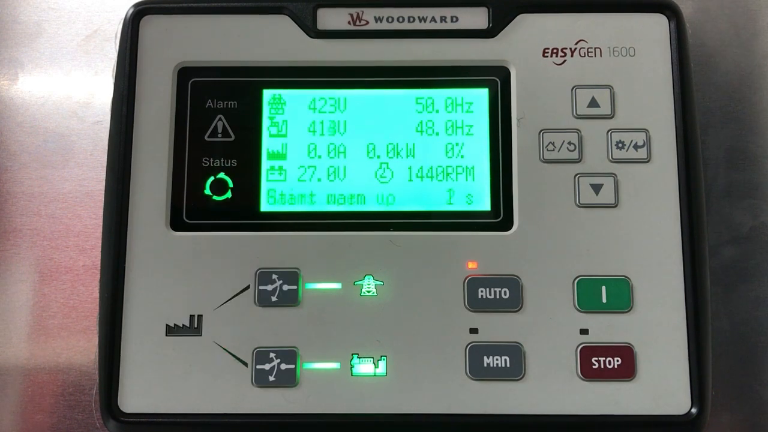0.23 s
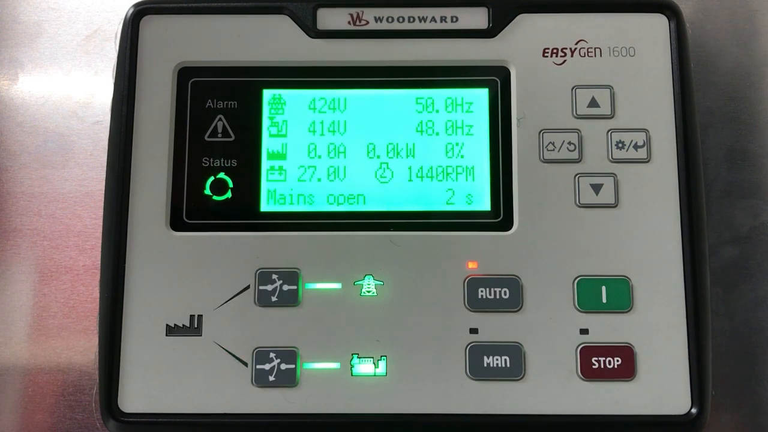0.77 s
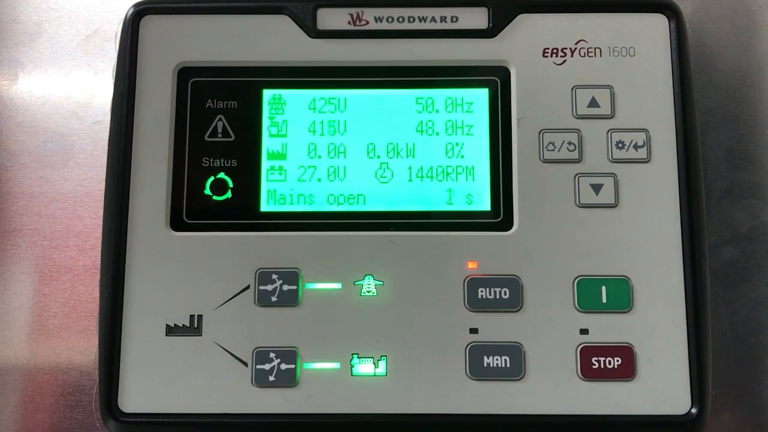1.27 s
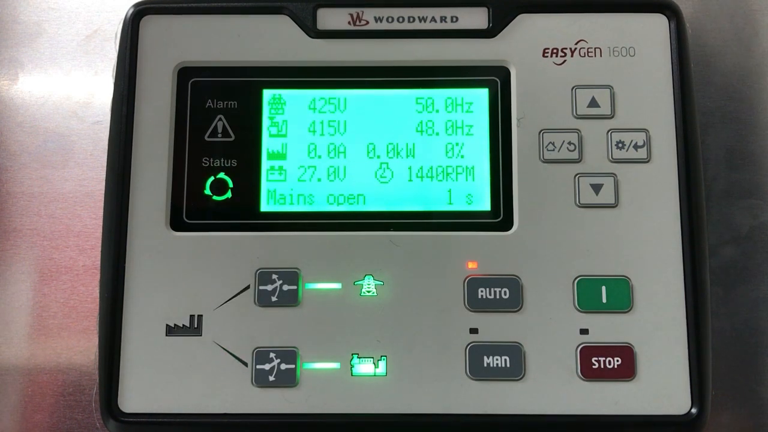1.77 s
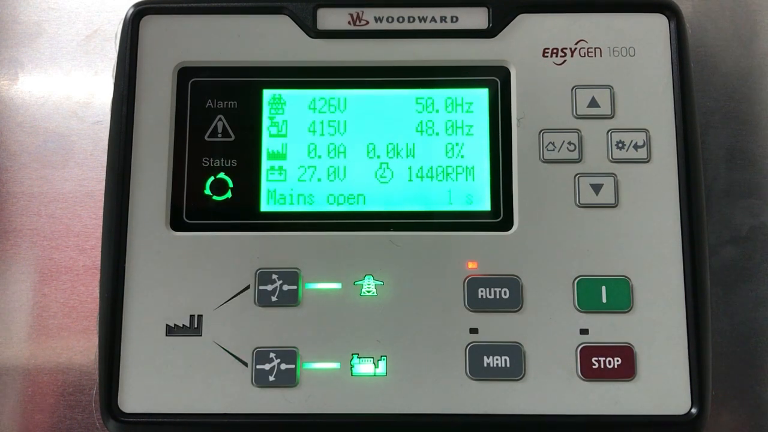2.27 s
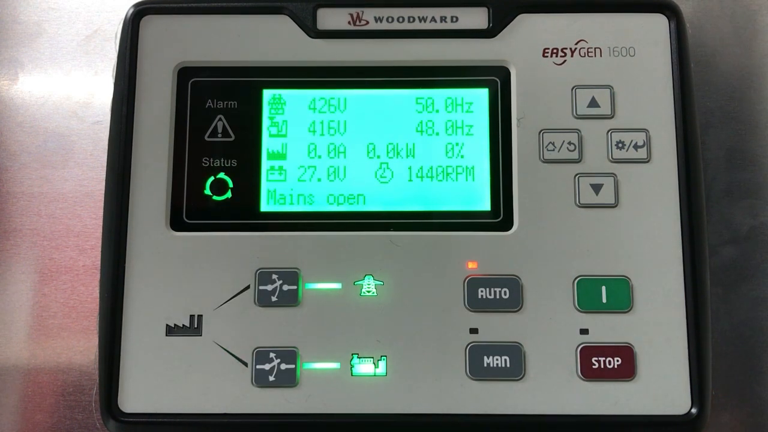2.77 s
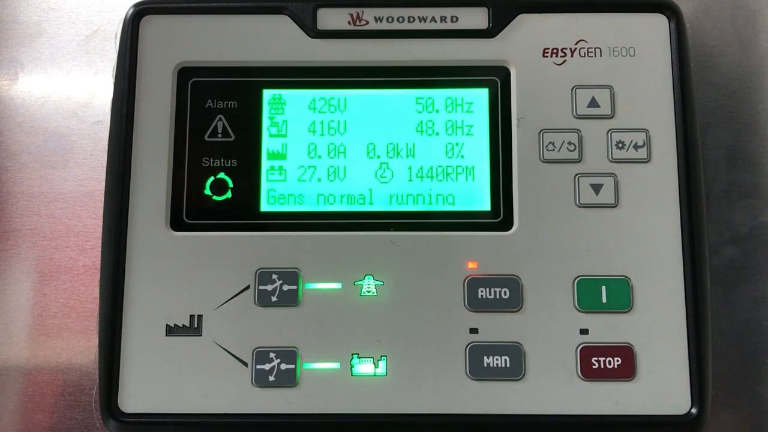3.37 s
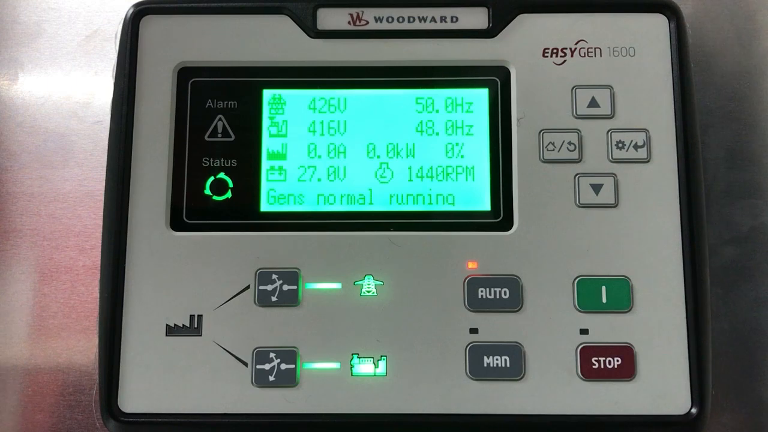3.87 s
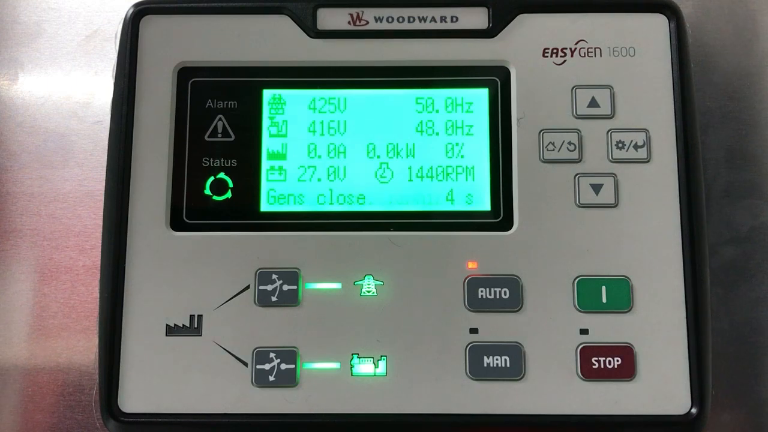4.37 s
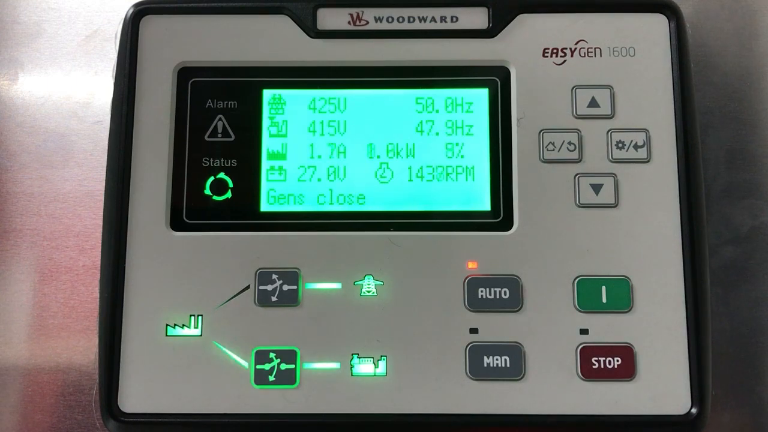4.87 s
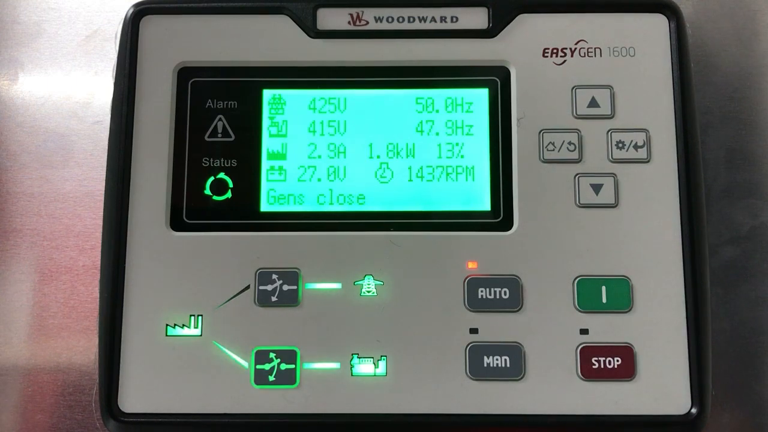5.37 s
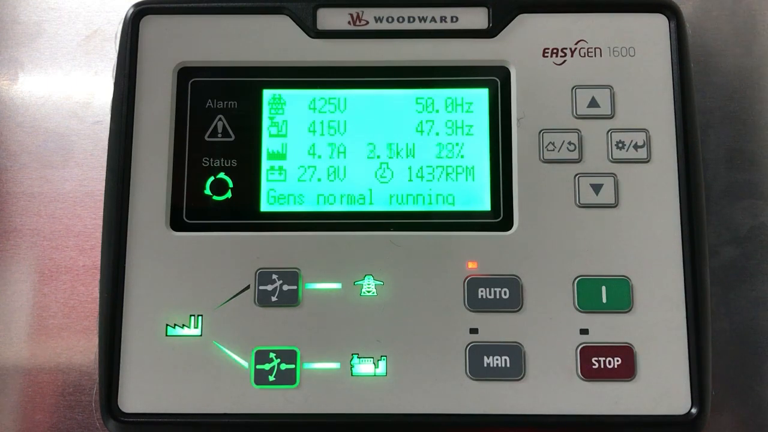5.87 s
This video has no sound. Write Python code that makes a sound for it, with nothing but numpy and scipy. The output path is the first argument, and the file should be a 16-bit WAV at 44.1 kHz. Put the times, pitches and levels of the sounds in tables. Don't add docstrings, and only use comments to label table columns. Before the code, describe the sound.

In a bare indoor test room, a tiny relay tick is followed at once by a loud, bouncing metallic contactor clunk that booms through cabinet panels. Sparse bright relay clicks follow over steady low generator hum and soft air noise. Around the middle a small latch clicks with a dull knock; later a sharper contact snaps shut, with more clicks after it. The microphone is fixed, the small relays closest.

```python
import sys
import numpy as np
from scipy import signal
from scipy.fft import rfft, irfft
from scipy.io import wavfile

SR = 44100
rng = np.random.default_rng(int(sys.argv[2]) if len(sys.argv) > 2 else 0)


def voltage_ratio(level):
    return 10 ** (np.asarray(level, float) / 20)


def store_wav(level_fs):
    pcm = np.round(np.clip(np.atleast_2d(level_fs), -1, 1) * 32767)
    wavfile.write(sys.argv[1], SR, pcm.T.astype(np.int16))


N = 269451
T = np.arange(N) / SR

# t/s, peak level/dB, brightness/(dB per octave)
CONTACTOR = [
    (0.0471, -44.5, -3.5),
    (0.05, -32.5, 0.5),
    (0.0553, -33.5, 0.5),
    (0.0635, -41, 3),
    (0.0713, -35.5, -2.3),
    (0.0806, -47, 0),
    (0.1085, -44, -4),
]
CONTACTOR_COLOUR = (-6, -10, -13.5, -22.5)
# f/Hz, level/dB, T60/s
CONTACTOR_MODES = [(440, -8, 0.024), (673, 1, 0.16), (890, 5.5, 0.039), (1322, 5, 0.058), (2040, 3, 0.064),
                   (2900, 16, 0.019), (4050, -22, .02), (6380, 11, 0.019)]


def contactor():
    return strikes(CONTACTOR, CONTACTOR_COLOUR, CONTACTOR_MODES,
                   rise_s=0.0015, chatter_s=0.0053, ring_db=-6.5, grit=0.98)


BAND_HZ = np.array([150, 1000, 3200, 6800, 11500, 15800])
BAND_SHARE_DB = -10 * np.log10(np.array([1200, 3500, 4000, 6000]) / (SR / 2))


def strikes(table, colour_db, modes, rise_s, chatter_s, ring_db, grit, lead_db=-99, bass_db=-9):
    lead_s = 0.0024
    case_t60_s, case_db = 0.055, -4
    top_cut_db = -3
    out = np.zeros((2, N + SR // 2))
    t = np.arange(SR // 2) / SR
    n = len(t)
    log_hz = np.log(np.arange(n // 2 + 1) * SR / n + 1)
    late = np.maximum(t - lead_s, 0)
    shape = (1 - np.exp(-late / rise_s)) ** 2 * np.exp(-late / chatter_s)
    scrape = voltage_ratio(lead_db) * (t < 2 * lead_s) * np.minimum(t / lead_s, 1)
    shape = shape / shape.max() + scrape
    for s, peak_db, bright_db in table:
        chatter = shape * rng.standard_normal(n) * voltage_ratio(grit * rng.exponential(size=n))
        blow = np.linalg.norm(chatter) * (np.arange(n) == int((lead_s + rise_s) * SR))

        ring = np.zeros(n)
        for hz, db, t60 in modes:
            struck_hz = hz * (1 + 0.0035 * rng.standard_normal())
            ring += voltage_ratio(db) * np.sin(2 * np.pi * struck_hz * t) * 1000. ** (-t / t60)
        ring *= voltage_ratio(ring_db - 3) / np.linalg.norm(ring)
        rung = signal.fftconvolve(0.6 * chatter + 1.3 * blow, ring)

        case = rng.standard_normal(n) * 1000. ** (-t / case_t60_s) * (1 - np.exp(-t / chatter_s))
        case *= voltage_ratio(case_db) / np.linalg.norm(case)
        scattered = signal.fftconvolve(blow, case)
        hit = np.array([chatter + (rung + scattered)[:n], blow])

        tilt_db = bright_db * np.log2(BAND_HZ[1:-1] / BAND_HZ[2])
        db = peak_db + np.array(colour_db) + tilt_db + BAND_SHARE_DB
        db = [db[0] + bass_db, *db, db[-1] + top_cut_db]
        colour = voltage_ratio(np.interp(log_hz, np.log(BAND_HZ), db))
        start = int((s - lead_s) * SR)
        level = np.sqrt(SR / 100) / np.linalg.norm(hit[0])
        out[:, start:start + n] += irfft(rfft(hit) * colour, n) * level
    return out[:, :N]


# f/Hz, level/dB, T60/s, build-up/s
BOOM = [(32.3, -43, 0.95, 0.09), (47.4, -19, 0.54, 0.12), (56, -33.5, 0.36, 0.003), (76, -29, 0.28, 0.021),
        (100.2, -33.5, 0.76, 0.049), (109.8, -29, 0.77, 0.025), (136.5, -39.5, 0.69, 0.051),
        (185, -29, 0.43, 0.046), (199.5, -35.5, 0.65, 0.043),
        (239, -33.5, 0.36, 0.0034), (261, -50.5, 0.89, .03), (264.7, -26.5, 0.18, 0.0033),
          (262.7, -30, 0.6, 0.088), (302.5, -50, 0.99, 0.057), (342, -58, 0.28, 0.054),
          (441, -44.5, 0.26, 0.0044), (568, -53, 0.97, 0.015)]


def cabinet_boom():
    t = np.maximum(T - 0.057, 0)
    out = np.zeros(N)
    for hz, db, t60, rise_s in BOOM:
        envelope = (1 - np.exp(-t / rise_s)) ** 2 * 1000. ** (-t / t60)
        out += voltage_ratio(db + 4.5 + 0.6 * walk(27.5)) * envelope * np.sin(2 * np.pi * hz * t)
    rumble = band(rng.standard_normal(N), 55, 375)
    rumble_t60_s, build_s = 1, 0.028
    envelope = (1 - np.exp(-t / build_s)) * 1000. ** (-t / rumble_t60_s)
    return out + voltage_ratio(-38) * envelope * rumble / rumble.std()


# t/s, peak level/dB, brightness/(dB per octave)
CLOSER = [
    (4.1076, -35, -1.7),
    (4.1173, -41.5, 2.1),
    (4.1252, -39, 0),
]
CLOSER_COLOUR = (-16.5, -14, -16, -13)
# f/Hz, level/dB, T60/s
CLOSER_MODES = [(335, -1, 0.043), (697, -0.5, 0.065), (1340, -15, 0.028), (1590, -8, .03), (1830, 1, 0.026),
                (2080, -5, 0.028), (3020, -3, 0.014), (3600, 1, 0.018), (6450, -10, 0.045),
                (6870, 5, 0.024), (7400, 1, 0.022), (11200, -4, 0.023)]


def closing_contact():
    return strikes(CLOSER, CLOSER_COLOUR, CLOSER_MODES,
                   rise_s=0.0005, chatter_s=0.0059, ring_db=0, grit=0.64)


# t/s, peak level/dB, brightness/(dB per octave)
PULL_IN = [
    (0.0112, -43, -1.2),
    (0.168, -40, 0.65),
    (0.6665, -40, 0.22),
    (2.107, -38.5, 0.75),
    (5.727, -38.5, 0.52),
]
DROP_OUT = [
    (0.1332, -41, .6),
    (4.2123, -40, -.3),
]
DOUBLE = [
    (4.4735, -42, .3),
    (4.4926, -40, .2),
]
PULL_IN_COLOUR = (-18.5, -11, -14, -15.5)
DROP_OUT_COLOUR = (-17, -14, -16.5, -10.5)
DOUBLE_COLOUR = (-13, -17.5, -19, -12.5)
# f/Hz, level/dB, T60/s
PULL_IN_MODES = [(1030, -1, .07), (2230, -3, .02), (2600, -8, .015), (3200, -4, .012), (3900, 1, .02),
                 (4300, -2, .012), (4850, -3, .01), (5350, -1, .01), (6600, -8, .01), (7600, -8, .01),
                 (8400, -10, .012), (11730, -4, .02)]
DROP_OUT_MODES = [(3820, -3, .03), (3980, 1, .05), (4170, -5, .035), (7010, -10, .02), (8800, -5, .02),
                  (10000, -4, .02), (11000, -2, .025), (12060, -17, .2), (12200, -4, .03), (14000, -7, .02)]
DOUBLE_MODES = [(3950, -3, .04), (4090, -5, .1), (4230, -7, .07), (4420, -3, .04), (4620, -6, .04),
                (5100, -9, .02), (6100, -16, .12), (7010, -13, .07), (9800, -5, .015), (10550, -12, .11),
                (11100, 1, .02), (12500, -9, .07), (13700, -9, .03)]


def small_relays():
    out = strikes(PULL_IN, PULL_IN_COLOUR, PULL_IN_MODES,
                  rise_s=0.001, chatter_s=0.0019, ring_db=2.5, grit=1.0, lead_db=-4)
    release = dict(rise_s=0.0004, chatter_s=0.004, ring_db=1.5, grit=1.0)
    out += strikes(DROP_OUT, DROP_OUT_COLOUR, DROP_OUT_MODES, **release)
    out += strikes(DOUBLE, DOUBLE_COLOUR, DOUBLE_MODES, **release)
    return out


# t/s, peak level/dB, brightness/(dB per octave)
LATCH = [
    (3.0302, -45.5, -0.28),
    (4.6354, -49.5, -1.1),
]
REBOUND = [
    (3.0404, -54, .6),
    (4.6505, -46, .5),
    (4.6564, -49, -0.89),
    (4.666, -53, -.8),
]
THUNK = [
    (3.032, -46.5, .6),
    (4.6362, -43, -0.18),
]
LATCH_COLOUR = (-22, -11.5, -10.5, -13)
REBOUND_COLOUR = (-26, -6.5, -14, -9.5)
THUNK_COLOUR = (-0.5, -23, -33, -42)
# f/Hz, level/dB, T60/s
LATCH_MODES = [(2330, -4, .05), (3040, -4, .015), (3800, -3, .015), (4300, -4, .04), (5480, -10, .06),
               (5700, -11, .06), (5950, -10, .05), (6200, -9, .05), (6900, -2, .02), (11300, -3, .015),
               (12400, -3, .02)]
THUNK_MODES = [(323, 6.5, 0.18), (382, 9.5, 0.16), (461, 1.5, 0.22), (540, -3, .25), (570, -3, 0.24),
               (757, 5, 0.16), (840, -7, 0.14), (1404, -14, 0.044), (1530, 0, 0.07), (1835, 16, 0.045),
               (2020, 18, 0.037)]


def latching_relay():
    out = strikes(LATCH, LATCH_COLOUR, LATCH_MODES,
                  rise_s=0.0006, chatter_s=0.0021, ring_db=-2, grit=0.83)
    out += strikes(REBOUND, REBOUND_COLOUR, LATCH_MODES,
                   rise_s=0.00079, chatter_s=0.0085, ring_db=1.0, grit=0.75)
    out += strikes(THUNK, THUNK_COLOUR, THUNK_MODES,
                   rise_s=0.00048, chatter_s=0.0018, ring_db=0.0, grit=0.87, bass_db=-12.5)
    return out


def friction():
    creep = band(rng.standard_normal(N), 3200, 8100) * 2.1
    creep *= swell(peak_s=0.053, rise_s=0.063, fall_s=0.012, peak_db=-54)
    rustle = band(rng.standard_normal(N), 13000, 15800) * 3.0
    rustle *= swell(peak_s=5.91, rise_s=0.05, fall_s=0.09, peak_db=-82)
    return creep + rustle


def swell(peak_s, rise_s, fall_s, peak_db):
    far = np.maximum((peak_s - T) / rise_s, (T - peak_s) / fall_s)
    return voltage_ratio(peak_db - 21 * far) * (T > peak_s - rise_s)


# f/Hz, T60/s
ROOM_T60 = [(200, 1), (420, 0.55), (1100, 1), (2900, 0.61), (7700, 0.34), (12800, 0.15)]


def room(x):
    t = T[:SR]
    tail = np.zeros(SR)
    room_hz, room_t60 = np.transpose(ROOM_T60)
    for hz in 200 * 2 ** np.arange(7):
        t60 = np.interp(np.log(hz), np.log(room_hz), room_t60)
        octave = band(rng.standard_normal(SR), hz / 2 ** 0.5, hz * 2 ** 0.5)
        tail += octave * 1000. ** (-t / t60)
    tail *= 1 - np.exp(-t / 0.03)
    return signal.fftconvolve(x, tail / np.sqrt(np.sum(tail ** 2)))[:N]


# multiple of shaft rate, idle level/dB, loaded level/dB
ORDERS = [(2, -55, -68), (6, -62, -61), (8, -63, -70), (10, -76, -80), (12, -80, -74), (14, -62, -66),
          (16, -75, -73), (18, -80, -76), (28, -78, -82), (30, -80, -72), (36.75, -71, -69), (39, -80, -75),
          (40, -81, -75)]


def generator_set():
    taken = np.clip((T - 4.3) / 0.2, 0, 1)
    load = 0.17 + 0.83 * taken
    turns = 0.437 + np.cumsum(24.029 - 0.065 * taken) / SR
    idle_db = -41.5 - 6 * np.clip(1 - T / 2.5, 0, 1) + 0.57 * walk(2.2)
    firing_db = idle_db * (1 - load) - 77 * load
    out = voltage_ratio(firing_db) * np.cos(2 * np.pi * 3 * turns)
    for order, idle_db, loaded_db in ORDERS:
        db = idle_db + (loaded_db - idle_db) * load + 1.2 * walk(3)
        out += voltage_ratio(db) * np.cos(2 * np.pi * order * turns)
    return out * 2 ** 0.5


def fan():
    return 2 ** 0.5 * voltage_ratio(-49 + 1.2 * walk(4)) * np.cos(2 * np.pi * (59.355 * T - 0.3))


# f/Hz, level/dB
TONES = [(45.7, -70), (50.8, -66), (76.3, -63), (110.5, -68), (231.5, -75), (297, -75), (355.6, -75),
         (376.2, -77), (662.3, -79), (1492, -80), (2762, -87)]
# multiple of motor rate, level/dB
MOTOR = [(1, -71), (3.5, -82), (6, -80), (7, -76), (8, -80), (10, -73), (12, -77), (14, -79)]
# multiple of mains frequency, level/dB
MAINS = [(2, -61), (4, -62), (26, -81)]


def steady_hum():
    motor_hz, mains_hz = 146.1, 50.04
    lines = list(TONES)
    lines += [(k * motor_hz, db) for k, db in MOTOR]
    lines += [(k * mains_hz, db) for k, db in MAINS]
    out = np.zeros(N)
    for hz, db in lines:
        out += voltage_ratio(db + 0.99 * walk(2.9)) * np.cos(2 * np.pi * (hz * T + rng.random()))
    return out * 2 ** 0.5


# f/Hz, level/(dB per Hz)
AIR = [(25, -16), (40, 4), (70, 1), (150, -4), (300, -14.5), (500, -21), (1000, -17.5), (1600, -20.5),
       (2500, -31), (4400, -40), (5000, -43.5), (8000, -44), (10500, -45), (12000, -45.5), (16500, -45.5)]
# f/Hz, width/Hz, level/dB
AIR_PEAKS = [(331, 90, 4), (649, 51, 6), (951, 107, 7), (1456, 160, -0.5), (1900, 210, -3.5),
             (3830, 510, 3), (4370, 170, 5.5), (5980, 1230, 4)]


def air():
    hz = np.maximum(np.arange(N // 2 + 1) * SR / N, 1)
    air_hz, air_db = np.transpose(AIR)
    db = np.interp(np.log(hz), np.log(air_hz), air_db) - 60 * (hz < 18)
    for peak_hz, width_hz, gain_db in AIR_PEAKS:
        db += gain_db * np.exp(-((hz - peak_hz) / width_hz) ** 2)
    spectrum = rfft(rng.standard_normal(N)) * voltage_ratio(db)
    out = np.zeros(N)
    for centre_hz in 16 * 2 ** np.arange(11):
        weight = np.clip(1 - abs(np.log2(hz / centre_hz)), 0, 1)
        flicker = voltage_ratio(1.8 * min(1, 1500 / centre_hz) * walk(9))
        out += flicker * irfft(spectrum * weight, N)
    return out * voltage_ratio(-53.5) / out.std()


def band(x, lo_hz, hi_hz):
    return signal.sosfilt(signal.butter(2, [lo_hz, hi_hz], "band", fs=SR, output="sos"), x)


def walk(rate_hz):
    points = int(T[-1] * rate_hz) + 2
    w = np.interp(T * rate_hz, np.arange(points), rng.standard_normal(points))
    return w / w.std()


def scene():
    clunk = contactor()
    clicks = small_relays()
    latch = latching_relay() + closing_contact()
    tail = room(voltage_ratio(-7) * clunk[1] + voltage_ratio(-11) * clicks[1] + voltage_ratio(-8) * latch[1])
    impacts = clunk[0] + clicks[0] + latch[0] + friction() + tail + cabinet_boom()
    background = generator_set() + fan() + steady_hum() + air()
    return (impacts + background)[None]


# f/Hz, width/Hz, level/dB
MIC_DIPS = [(5060, 450, -0.5), (10300, 410, -3.5)]


def microphone(x):
    hz = np.arange(N // 2 + 1) * SR / N
    dips_db = sum(db * np.exp(-((hz - f) / width) ** 2) for f, width, db in MIC_DIPS)
    return irfft(rfft(x) * voltage_ratio(dips_db), N)


def roll_off(x):
    return signal.sosfilt(signal.butter(12, 16360, fs=SR, output="sos"), x)


def record(dry):
    top = signal.ellip(10, 0.2, 60, 15800, fs=SR, output="sos")
    mix = signal.sosfilt(top, microphone(dry))
    return roll_off(mix)


dry = scene()
out = record(dry)
store_wav(out)
```